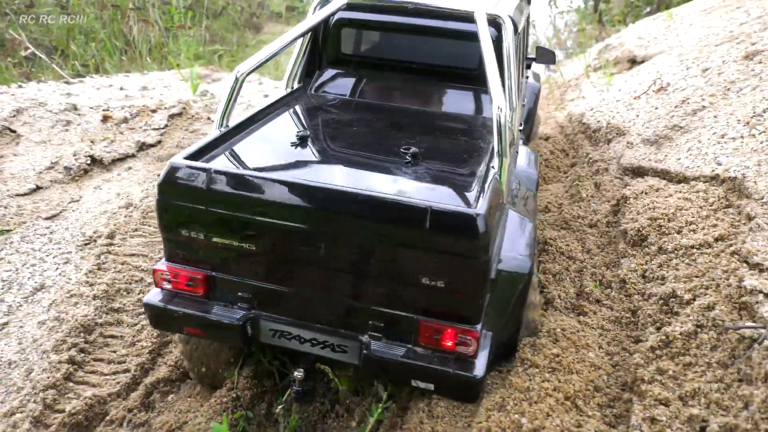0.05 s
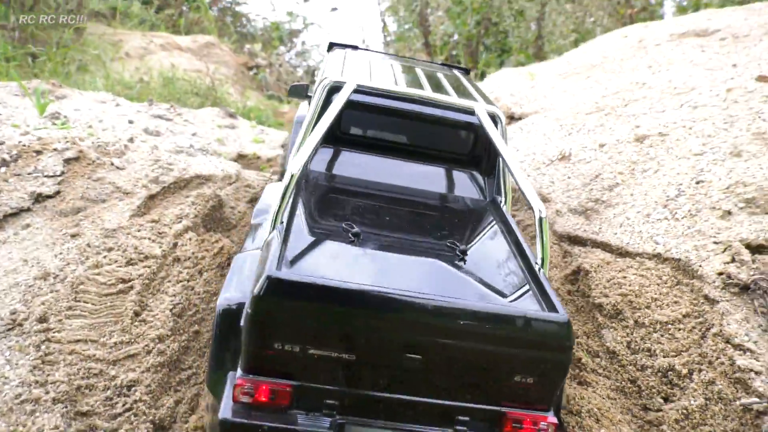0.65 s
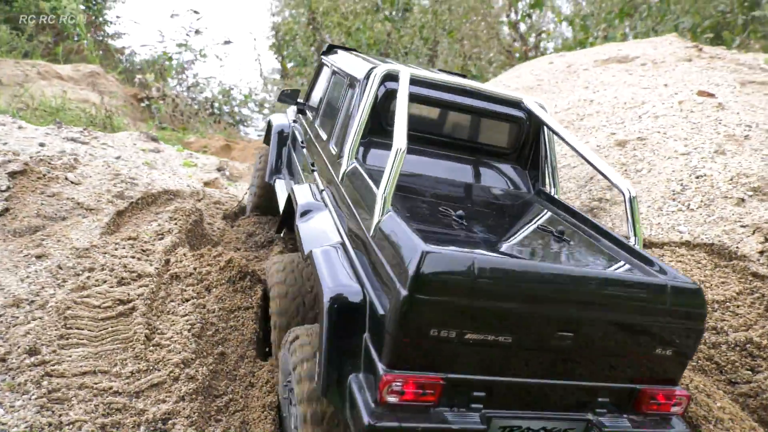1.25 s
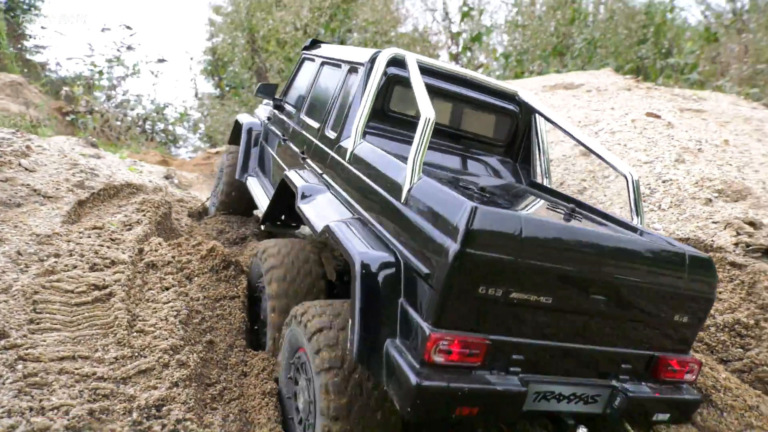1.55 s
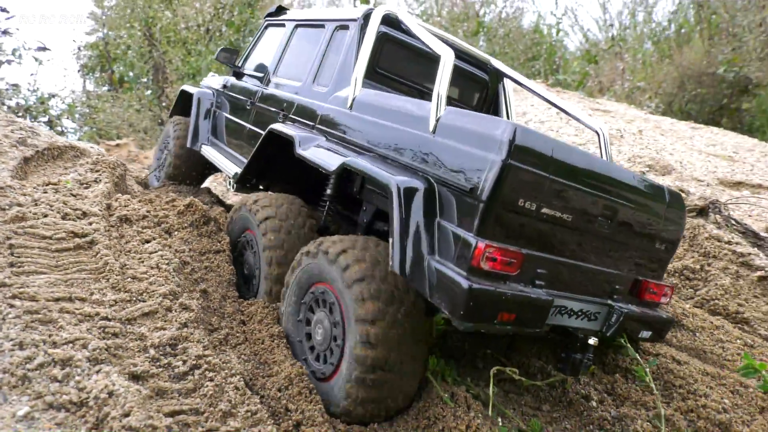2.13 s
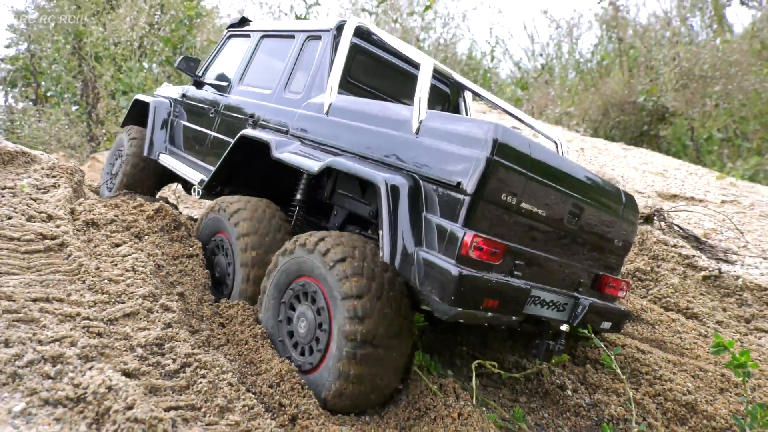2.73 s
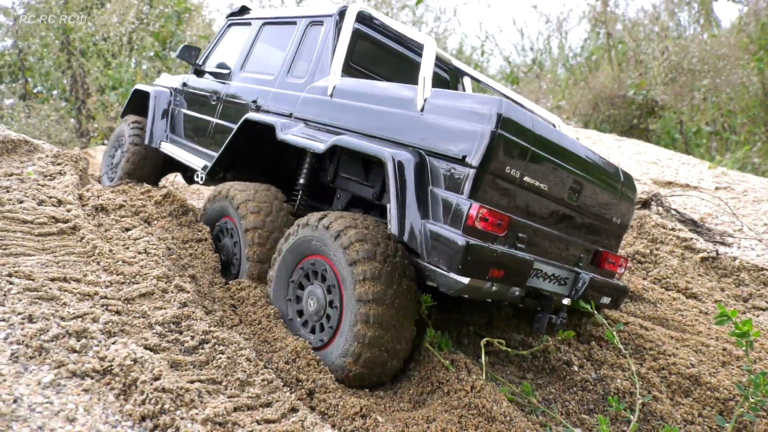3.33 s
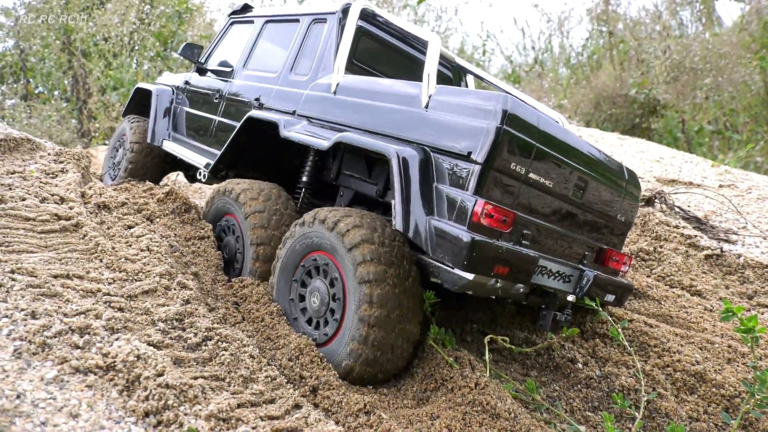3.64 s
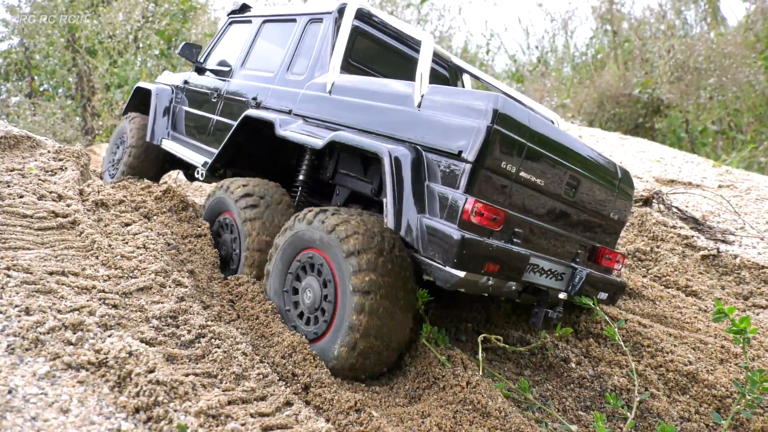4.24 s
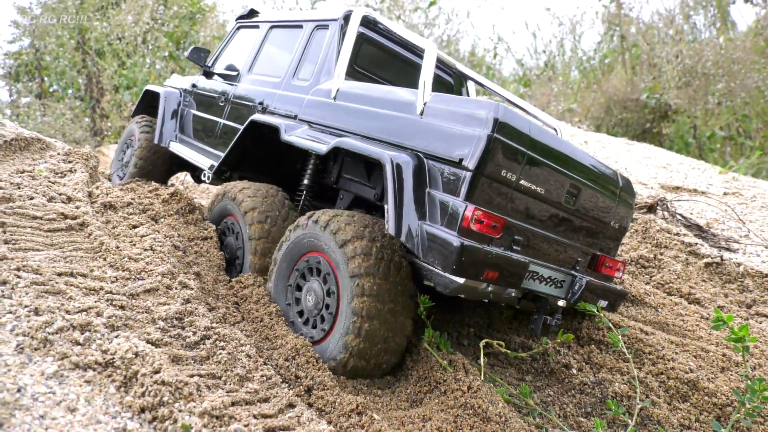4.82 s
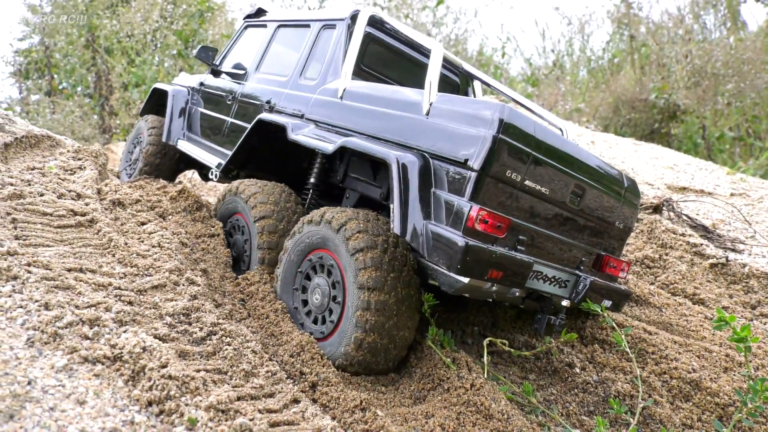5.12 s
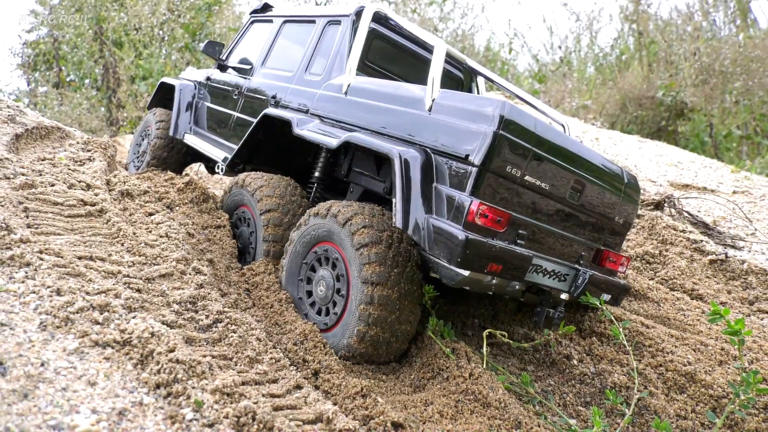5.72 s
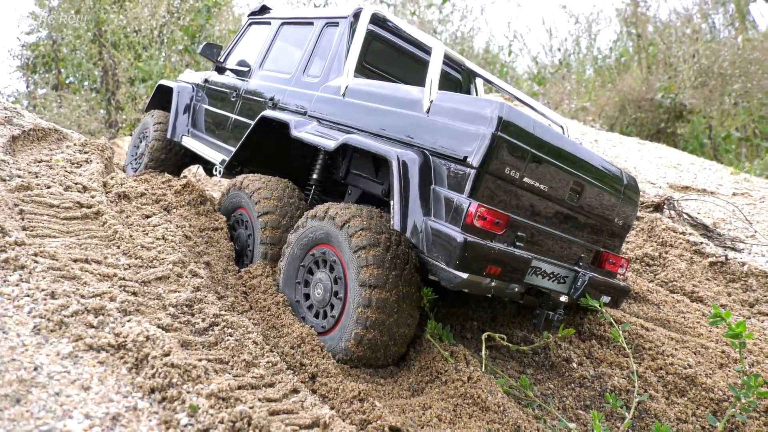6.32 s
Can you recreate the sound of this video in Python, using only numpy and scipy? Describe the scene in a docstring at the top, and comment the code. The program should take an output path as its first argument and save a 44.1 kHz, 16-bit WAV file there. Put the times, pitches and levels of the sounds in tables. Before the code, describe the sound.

Close up, a radio-controlled truck whines and rattles over loose sand, its motor dropping in pitch until it nearly stalls.

```python
"""A small electric model truck, close to the microphone, crawls up loose sand and slows almost to a stall.
Its gear train hums on multiples of one shaft's turn; loose teeth knock in the hollow plastic body
and rasp in the gearbox, and the motor pinion warbles above them. The tyres crunch the slope and
fling grit against the shell. Behind the truck lie faint open air and a low drone."""
import sys
import numpy as np
from scipy import signal
from scipy.fft import rfft, irfft
from scipy.io import wavfile
from scipy.ndimage import uniform_filter1d

SR = 44100
rng = np.random.default_rng(int(sys.argv[2]) if len(sys.argv) > 2 else 0)


def master_out(mix):
    """Clip the mix to full scale and print it as 16-bit PCM to the path in sys.argv[1]."""
    frames = np.transpose(np.atleast_2d(mix))
    ceiling = np.clip(frames, -1, 1)
    pcm = np.round(ceiling * 32767).astype(np.int16)
    wavfile.write(sys.argv[1], SR, pcm)


N = 280917
TIME = np.arange(N) / SR

# pace of the shaft up the slope: (time [s], speed [turns/s])
SHAFT_SPEED = [(0, 25.9), (.25, 26.55), (1.36, 26.7), (1.55, 26.42), (1.92, 26.37), (2.2, 26.67),
               (2.8, 26.62), (3.05, 25.5), (3.3, 24.05), (3.5, 22.3), (3.7, 20.15), (4, 19.8), (4.8, 19.78),
               (4.97, 19.4), (5.15, 18.5), (5.38, 12.7), (5.66, 7.1), (6.37, 6.95)]
# strain on the gears: (time [s], level [dB])
GEAR_LOAD = [(0, -18.5), (.3, -19), (.75, -20.5), (1.33, -18.5), (1.42, -18.5), (1.8, -20.5), (2.35, -19),
             (2.95, -21.5), (3.25, -19), (3.6, -19.5), (4.2, -18.5), (4.5, -19.5), (4.8, -17), (5.55, -20),
             (5.7, -23.5), (5.85, -20), (6.37, -21)]
def shaft():
    """One shaft paces the gear train: its turns so far, its speed and the strain on it."""
    speed, = curves(SHAFT_SPEED)
    load_db, = curves(GEAR_LOAD)
    return np.cumsum(speed) / SR, speed, load_db


def braking(speed, hard_hz_per_s=24):
    """How hard the shaft is slowing, 1 at hard braking."""
    slowing = -np.gradient(uniform_filter1d(speed, SR // 12, mode="nearest")) * SR
    return np.maximum(slowing, 0) / hard_hz_per_s


# three strong gear tones: (multiple of shaft speed, level [dB], share of the brightness they follow)
HUM_TONES = [(8, -19, -0.26), (12, -20, 1.2), (16, -20, 0.48)]
# brightness of the hum: (time [s], gain [dB])
HUM_BRIGHTNESS = [(0, 0), (.35, -2.5), (.62, -9), (1.37, -12.5), (1.44, -1), (2.35, -0.5), (2.9, -5.5),
                  (3.35, -2), (3.7, -2.5), (4.8, -4)]
# chassis resonances that the hum slides through: (frequency [Hz], gain [dB])
CHASSIS = [(100, -12.5), (158, -4), (185, -0.5), (210, 6.5), (240, -4), (283, 2.5), (316, 3), (340, -3),
           (385, 2), (425, -2.5)]
# weaker gear tones that follow the strain: (multiple of shaft speed, relative level [dB])
SIDE_TONES = [(6, -12), (7, -9), (9, -9), (10, -5), (11, -6), (13, -1), (14, -9), (15, -7), (18, -7),
              (19, -7), (20, -7), (21, -9), (22, .5), (24, -3), (27, -10), (28, -7), (30, -8), (32, -10),
              (33, -10), (35, -6), (36, -8), (38, -6), (40, -6), (58, -6), (62, -4)]
# tones that groan as the shaft slows to a crawl: (multiple of shaft speed, level [dB])
GROAN_TONES = [(20, -21), (30, -16)]
# strength of the groan: (speed [turns/s], gain [dB])
GROAN_BY_SPEED = [(7.5, -12.5), (9, -8.5), (11.5, 0), (14.5, -2.5), (16, -20), (20, -49)]
# response of the hollow plastic body: (frequency [Hz], gain [dB])
HOLLOW_BODY = [(40, -38), (110, -30), (140, -14), (185, -1.5), (270, 0), (325, -2), (400, 1.5), (470, -2),
               (550, -6), (600, -12), (645, -10), (710, -18), (850, -31), (1600, -55), (4000, -90),
               (16000, -110)]
def gear_tones(turns, speed, load_db, usual_load_db=-19.5, fade_below_hz=19.3, shudder_hz=39.86):
    """Meshing gears hum and swell through resonances; they shudder and groan as the shaft slows."""
    angle = 2 * np.pi * turns + .008 * walk(14)
    phase = 2 * np.pi * rng.random(128)
    slowing = braking(speed)
    bright_db, = curves(HUM_BRIGHTNESS)
    bright_db += 14.5 * np.minimum(slowing, .35) * walk(shudder_hz)  # uneven throb while braking
    drive_db = .47 * (load_db - usual_load_db) - 2 * np.maximum(fade_below_hz - speed, 0)
    tones = 0
    for k, db, share in HUM_TONES:
        gain = undb(db + drive_db + share * bright_db) * response(CHASSIS, k * speed)
        tones += gain * np.sin(k * angle + phase[k])
    for k, db in SIDE_TONES:
        waver = .2 * walk(7)
        gain = undb(load_db - 5 + db + 2.5 * walk(4)) * response(HOLLOW_BODY, k * speed)
        tones += gain * np.sin(k * angle + phase[k] + waver)
    groan = slowing * undb(np.interp(speed, *np.transpose(GROAN_BY_SPEED)))
    for k, db in GROAN_TONES:
        gain = groan * undb(db + 3.5 * walk(30)) * response(HOLLOW_BODY, k * speed)
        tones += gain * np.sin(k * angle + phase[k])
    return np.sqrt(2) * tones


def teeth(turns, slack, worn_db, scatter_db, count):
    """Tooth contacts: a pattern of wear repeats every turn, and play shifts and scales each contact."""
    wear = rng.standard_normal(count)
    late, size = rng.standard_normal((4096, 2)).T
    tooth = np.arange(len(late))
    times = np.interp((tooth + slack * late) / count, turns, TIME, right=N)
    return strikes(times, undb(worn_db * wear[tooth % count] + scatter_db * size))


def gear_rattle(turns, speed, load_db):
    """Loose teeth knock in the body: softer in mesh at full speed, coming apart to a grumble at a crawl."""
    knocks = teeth(turns, slack=.3, worn_db=2.2, scatter_db=1.8, count=28) / np.sqrt(speed)
    mesh_db = np.interp(speed, [6.99, 7, 14, 15], [0, -.36, .5, -3.5])
    return undb(load_db + mesh_db - 1) * unit(through(knocks - knocks.mean(), ring(HOLLOW_BODY)))


# gearbox resonances: (frequency [Hz], width [Hz], gain [dB])
GEARBOX_MODES = [(895, 110, 2), (1406, 275, 0), (1850, 200, -1), (2410, 163, 2), (3235, 160, -6.5),
                 (3670, 130, -10.5), (4354, 130, -12), (4725, 170, -13.5), (5780, 220, -12.5),
                 (6700, 95, -20.5), (7340, 270, -29), (8000, 190, -27)]
# strength of the rasp: (speed [turns/s], level [dB])
RASP_BY_SPEED = [(7, -51.5), (9, -42), (15, -41.5), (20, -40), (23, -41.5), (26.6, -37.5)]
# treble of the rasp: (time [s], gain [dB])
RASP_TREBLE = [(0, -2), (1.4, -7), (3.3, 2), (5.1, 0.5), (5.37, 9.5), (5.55, -1.5), (6.37, -11.5)]
def gear_rasp(turns, speed):
    """Teeth scrape over each other and ring the gearbox, louder at speed."""
    t = np.arange(2048) / SR
    box = sum((-1) ** k * undb(db) * width * np.exp(-np.pi * width * t) * np.sin(2 * np.pi * hz * t)
              for k, (hz, width, db) in enumerate(GEARBOX_MODES))
    contacts = teeth(turns, slack=.12, worn_db=4, scatter_db=2, count=16) / np.sqrt(speed)
    rasp = unit(through(scrape(contacts, decay_s=.013), box))
    treble = signal.sosfiltfilt(signal.butter(2, 3300, "high", fs=SR, output="sos"), rasp)
    treble_db, = curves(RASP_TREBLE)
    level_db = np.interp(speed, *np.transpose(RASP_BY_SPEED)) - braking(speed) ** 2
    return undb(level_db) * (rasp + (undb(treble_db) - 1) * treble)


# jolts of the drive train, most of them near the stall: (time [s], level [dB])
JOLTS = [(3.359, -15), (5.752, -6.5), (5.866, -10), (6.03, -5), (6.088, -19), (6.18, -9), (6.229, -7.5),
         (6.277, -4), (6.338, -4)]
def jolts():
    """The drive train takes up its slack with a thud and a small clack."""
    times, db = np.transpose(JOLTS)
    hits = strikes(times, undb(db))
    thud = ring(HOLLOW_BODY)
    clack_ring = ring([(700, -8), (1600, -2), (2400, 12), (3000, -9), (5000, -15), (5800, -9),
                       (6600, -28), (9000, -40)])
    clack = through(scrape(hits, decay_s=.0022), clack_ring)
    return through(hits, thud / np.abs(thud).max()) + undb(-27) * clack


# whine of the motor pinion: (time [s], level [dB])
PINION_LEVEL = [(0, -39), (.55, -41), (1.5, -45.5), (3, -52), (3.8, -63)]
def pinion(turns, multiple=91.5, wobbles_per_turn=.355, pitch_swing=.04):
    """A thin, rough whine warbles with a slightly off-centre gear, loudest where its pitch is lowest."""
    level_db, = curves(PINION_LEVEL)
    wobble = 2 * np.pi * wobbles_per_turn * turns + .6 * walk(5)
    roughness = .3 * walk(220)
    angle = multiple * (2 * np.pi * turns + pitch_swing / wobbles_per_turn * np.sin(wobble)) + roughness
    gain = undb(level_db - 1 - 3 * np.cos(wobble) + 1.7 * walk(60))
    return gain * (np.sin(angle) + undb(-15) * np.sin(2 * angle))


# thin overtones of the gears: (multiple of shaft speed, relative level [dB])
GEAR_OVERTONES = [(35, -7), (50, -9), (101, -10), (114, -13)]
def gear_overtones(turns):
    """Unsteady gear overtones fade along with the pinion's whine."""
    level_db, = curves(PINION_LEVEL)
    return sum(undb(level_db - 1.5 + db + 2.4 * walk(12)) * np.sin(2 * np.pi * k * turns + 1.1 * walk(25))
               for k, db in GEAR_OVERTONES)


# sand giving way under the tyres: (time [s], level [dB])
SAND_LEVEL = [(0, -45), (.65, -43.5), (.9, -47.5), (1.5, -43), (2.35, -38.5), (2.57, -47.5), (2.8, -46.5),
              (3.3, -45), (3.65, -61.5), (4.2, -50), (4.8, -48.5), (5.4, -60.5)]
# tread blocks breaking through the crust: (time [s], level [dB], decay [s])
CRUST_BREAKS = [(0.361, -32, 0.012), (.432, -30, 0.012), (.718, -28.5, 0.0058), (1.005, -26.5, 0.016),
                (1.028, -28, 0.0084), (1.083, -28, .012), (1.151, -25, 0.018), (1.583, -23, 0.018),
                (1.61, -31, 0.0086), (1.645, -24, 0.012), (1.729, -24.5, 0.019), (1.826, -28.5, 0.017),
                (1.943, -25.5, 0.03), (2.011, -32, .012), (2.097, -30.5, 0.021), (2.172, -24.5, 0.02),
                (2.241, -29.5, 0.023), (2.322, -30, .015), (2.347, -30, 0.0086), (2.392, -26.5, 0.013),
                (2.412, -27, 0.016), (2.456, -27.5, 0.021), (2.771, -30, 0.017), (2.837, -27.5, .015),
                (3.33, -30.5, 0.022), (3.389, -30.5, 0.017)]
# colour of crushed sand, close up: (frequency [Hz], gain [dB])
SAND_COLOUR = [(150, -30), (400, -12), (750, -3), (1080, -4), (1350, 0), (1900, -3), (2450, -2), (3100, -7),
               (4000, -11), (5000, -15), (5800, -13), (6500, -17), (9000, -21), (12000, -29), (15500, -39)]
def sand_crunch(sand_db, attack_s=.0009):
    """Countless grains crack under the tyres, in uneven flurries and in bursts where the crust breaks."""
    when, size, sign = rng.random((26000, 3)).T
    grain_db = 3.1 * np.minimum(-np.log(1 - size), 5.5)  # many small grains, few large
    grains = strikes(when * N / SR, np.sign(sign - .5) * undb(grain_db))
    cracks = unit(grains) + .8 * unit(scrape(grains, decay_s=.0015))
    flurry_db = 3 * walk(70)
    power = undb(sand_db + 2.5 + flurry_db) ** 2
    for start, db, decay_s in CRUST_BREAKS:
        age = np.maximum(TIME - start, 0)
        power += (undb(db) * np.minimum(age / attack_s, 1) * np.exp(-age / decay_s)) ** 2
    return np.sqrt(power) * unit(through(cracks, ring(SAND_COLOUR)))


# the largest grains hitting the shell: (time [s], level [dB])
COARSE_GRIT = [(0.253, -32), (.298, -31), (0.527, -31), (.718, -23.5), (1.152, -25), (1.217, -25.5),
               (1.289, -26), (1.376, -30), (1.509, -29.5), (1.728, -22), (1.79, -28), (1.945, -30),
               (2.012, -28.5), (2.174, -27), (2.242, -28.5), (2.312, -26), (2.324, -27), (2.393, -23),
               (2.458, -23), (2.477, -28), (2.529, -27), (2.835, -21.5), (2.892, -34), (2.912, -23.5),
               (2.981, -22), (3.048, -32), (3.331, -27), (3.822, -36), (4.068, -32), (4.133, -33),
               (4.194, -33)]
# colour of grit on the shell: (frequency [Hz], gain [dB])
GRIT_COLOUR = [(150, -35), (500, -12), (1300, 1), (2400, 1), (3800, -4), (4900, -5), (5800, 1), (6800, -5),
               (9000, -9), (12000, -16), (15500, -23)]
def grit(sand_db, fine_count=44):
    """Coarse grains tick on the plastic shell; finer ones land at random, harder as more sand moves."""
    coarse_times, coarse_db = np.transpose(COARSE_GRIT)
    fine_times = rng.random(fine_count) * N / SR
    fine_db = np.interp(fine_times, TIME, sand_db) + 3.5 + 3 * rng.standard_normal(fine_count)
    hits = strikes(coarse_times, undb(coarse_db)) + strikes(fine_times, undb(fine_db))
    return undb(4.5) * through(scrape(hits, decay_s=.0027), ring(GRIT_COLOUR))


def tyre_rumble(sand_db):
    """The soft tyres rumble as the ground gives way."""
    tyre = ring([(20, -16), (45, -13), (70, -2), (92, 0), (125, -7), (220, -20), (800, -60), (4000, -90)])
    return undb(sand_db + 5.5) * unit(through(rng.standard_normal(N), tyre))


# open air around the slope: (frequency [Hz], gain [dB])
AIR_COLOUR = [(20, -2), (55, 0), (110, -3), (400, -10), (1500, -22), (4000, -38), (9000, -46), (15500, -50)]
# a faint drone in the background: (time [s], level [dB])
DRONE_LEVEL = [(3.7, -61.5), (4.9, -46.5), (6.37, -43.5)]
def open_air(drone_hz=55.4):
    """Faint outdoor noise behind the truck, with a low wavering drone."""
    drone_db, = curves(DRONE_LEVEL)
    drone = undb(drone_db + 2 * walk(8)) * np.sin(2 * np.pi * drone_hz * TIME + .7 * walk(14))
    air_gain = undb(-52.5 + 1.1 * walk(2.1))
    return drone + air_gain * unit(through(rng.standard_normal(N), ring(AIR_COLOUR)))


def undb(db):
    """Decibels to gain."""
    return 10 ** (np.asarray(db) / 20)


def unit(x):
    """Scale to rms 1."""
    return x / np.sqrt(np.mean(x ** 2))


def curves(table):
    """The columns of a table of times, joined by straight lines."""
    times, *columns = np.transpose(table)
    return [np.interp(TIME, times, column) for column in columns]


def response(outline, hz):
    """Gain of a (frequency [Hz], gain [dB]) outline at the given frequencies."""
    outline_hz, db = np.transpose(outline)
    return undb(np.interp(np.log(np.maximum(hz, 1)), np.log(outline_hz), db))


def ring(outline, size=4096):
    """Minimum-phase impulse response of a (frequency [Hz], gain [dB]) outline."""
    hz = np.arange(size // 2 + 1) * SR / size
    cepstrum = irfft(np.log(response(outline, hz)))
    cepstrum[1:size // 2] *= 2
    cepstrum[size // 2 + 1:] = 0
    return irfft(np.exp(rfft(cepstrum)))


def through(x, impulse):
    """Pass a sound through an impulse response."""
    return signal.oaconvolve(x, impulse)[:N]


def walk(rate_hz):
    """Random wander with a spread near 1."""
    knots = rng.standard_normal(2048)
    return 1.2 * np.interp(TIME * rate_hz, np.arange(len(knots)), knots)


def strikes(times, sizes):
    """Impulses at the given times."""
    return np.bincount(np.clip(np.asarray(times) * SR, 0, N).astype(int), sizes, N + 1)[:N]


def scrape(hits, decay_s):
    """Each impulse becomes a short burst of noise."""
    energy = signal.lfilter([1], [1, -np.exp(-2 / (decay_s * SR))], hits ** 2)
    return np.sqrt(energy) * rng.standard_normal(N)


def scene():
    """At one close microphone: the shaft drives the gears; yielding sand drives rumble, crunch and grit."""
    turns, speed, load_db = shaft()
    sand_db, = curves(SAND_LEVEL)
    gears = gear_tones(turns, speed, load_db) + gear_rattle(turns, speed, load_db) + gear_rasp(turns, speed)
    ground = tyre_rumble(sand_db) + sand_crunch(sand_db) + grit(sand_db)
    return (gears + pinion(turns) + gear_overtones(turns) + jolts() + ground + open_air())[None]


def record(dry):
    """The recorder cuts the treble above 15.8 kHz."""
    return signal.sosfilt(signal.ellip(10, .2, 80, 15800, fs=SR, output="sos"), dry)


dry = scene()
out = record(dry)
master_out(out)
```